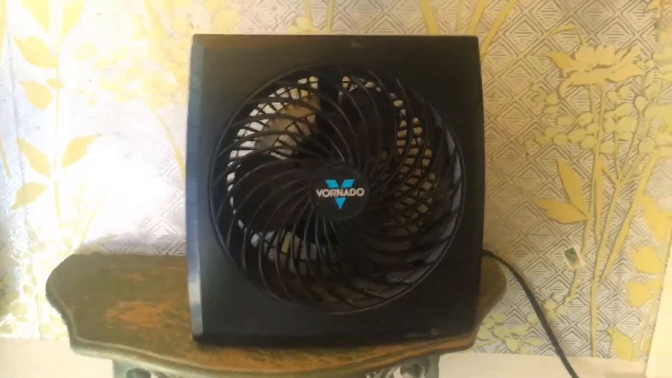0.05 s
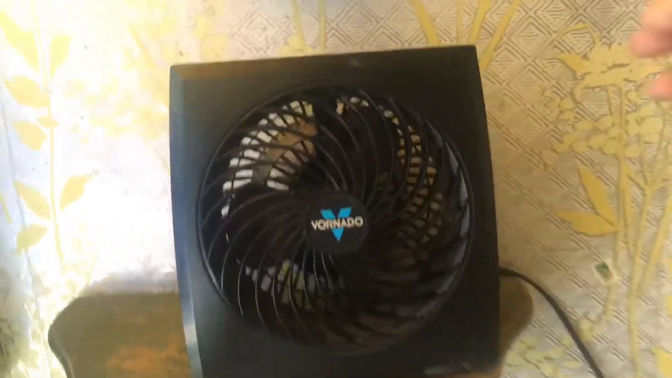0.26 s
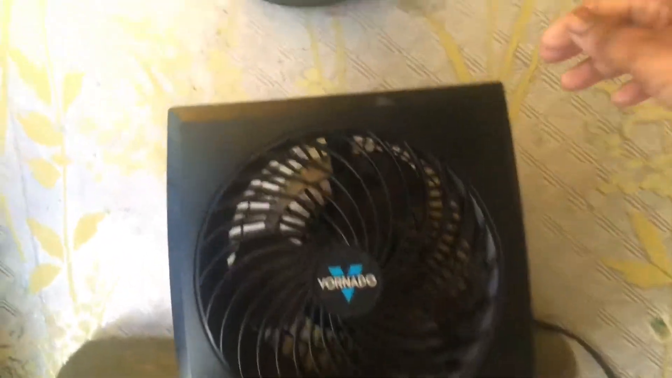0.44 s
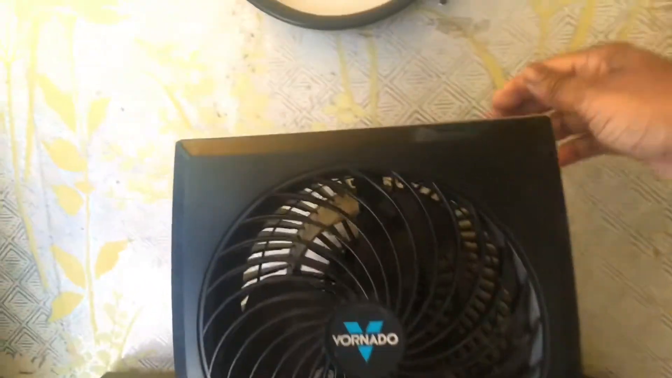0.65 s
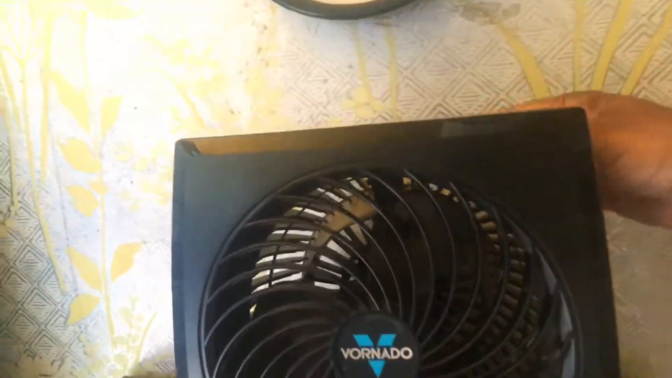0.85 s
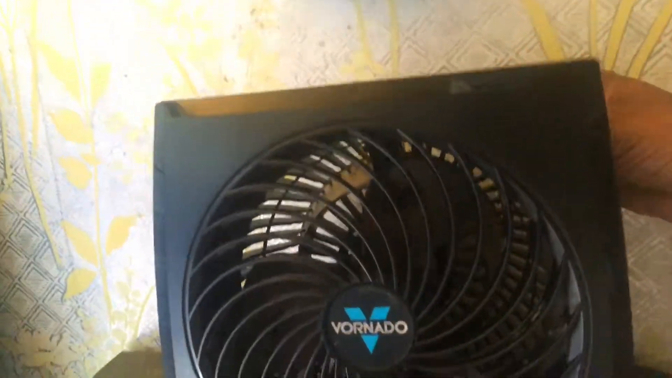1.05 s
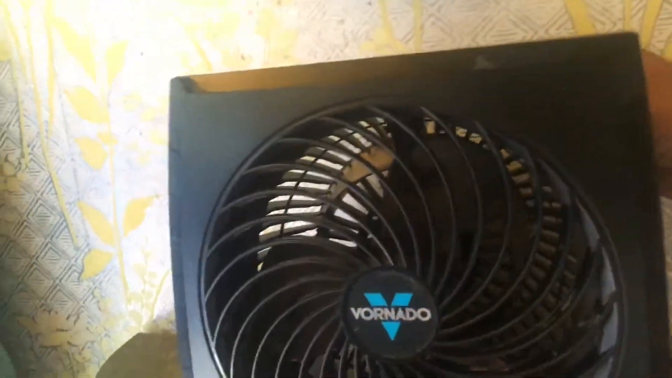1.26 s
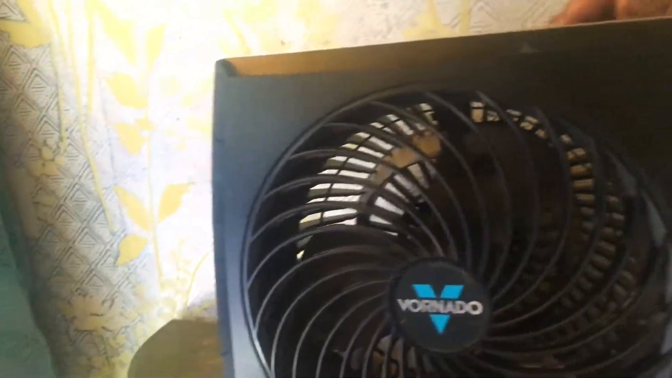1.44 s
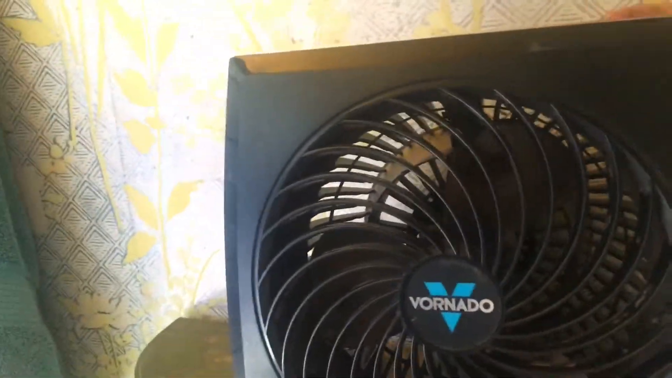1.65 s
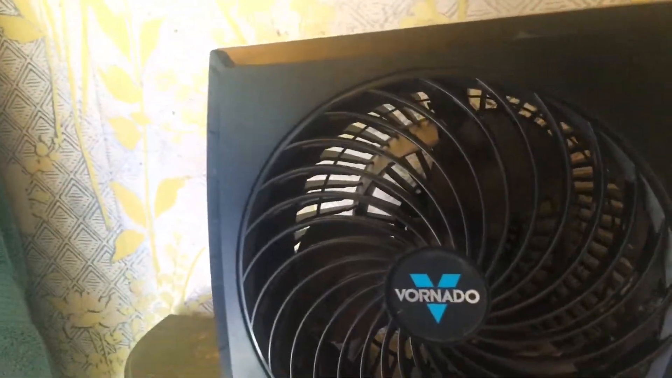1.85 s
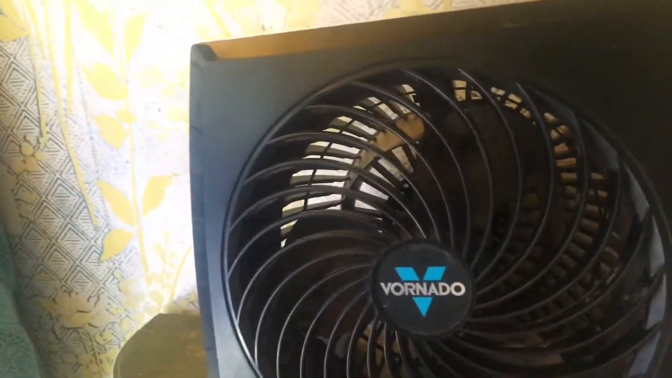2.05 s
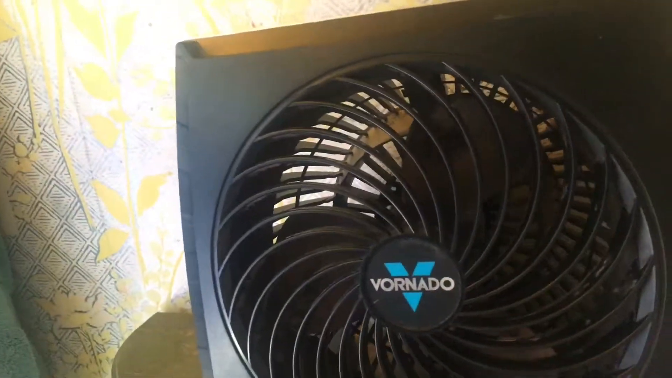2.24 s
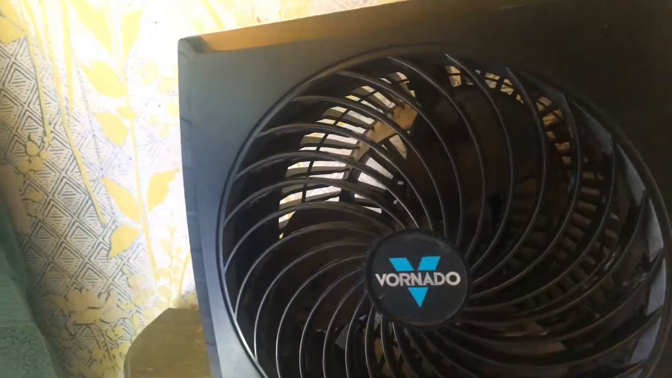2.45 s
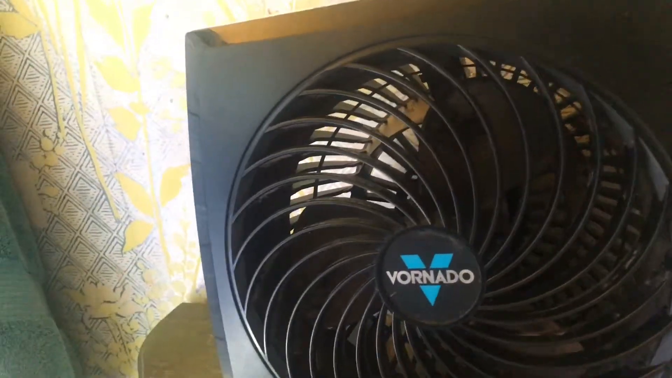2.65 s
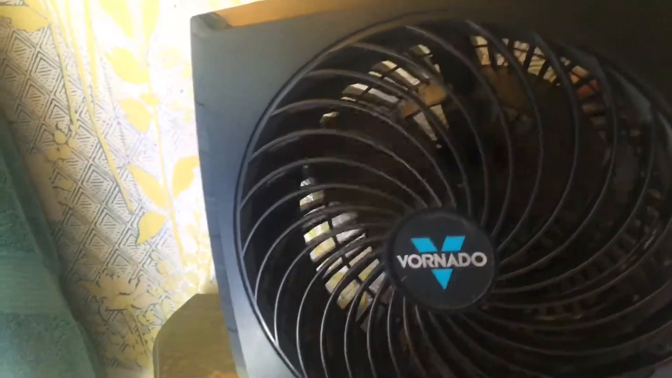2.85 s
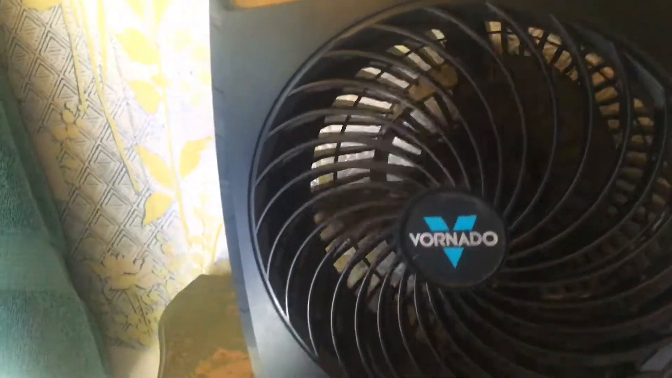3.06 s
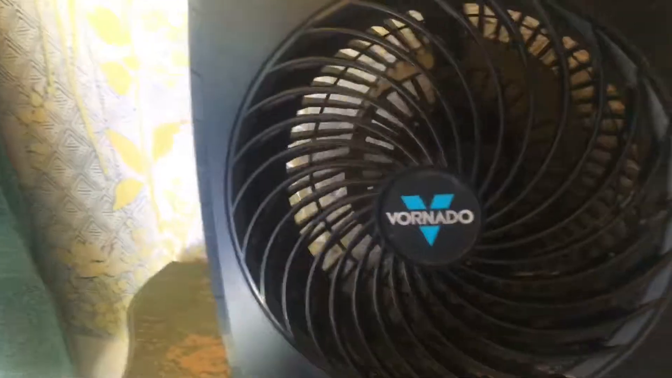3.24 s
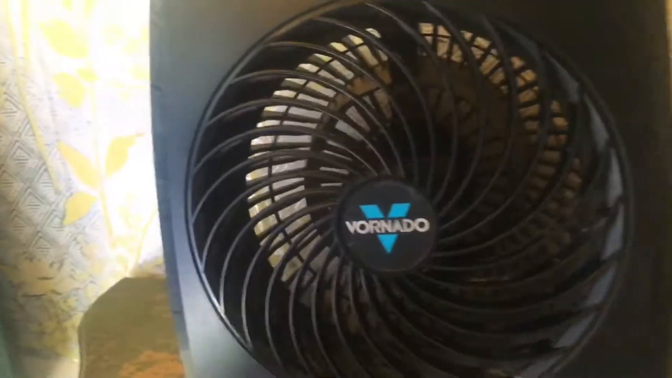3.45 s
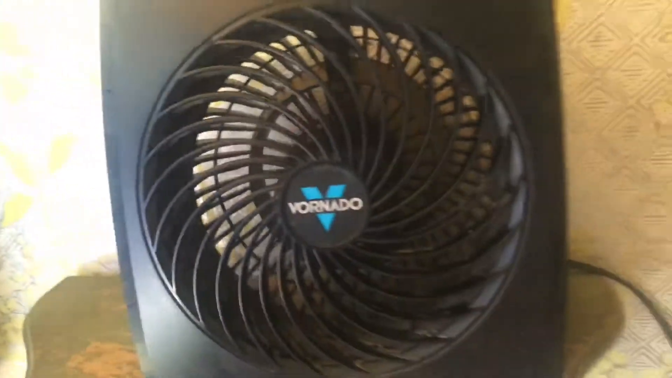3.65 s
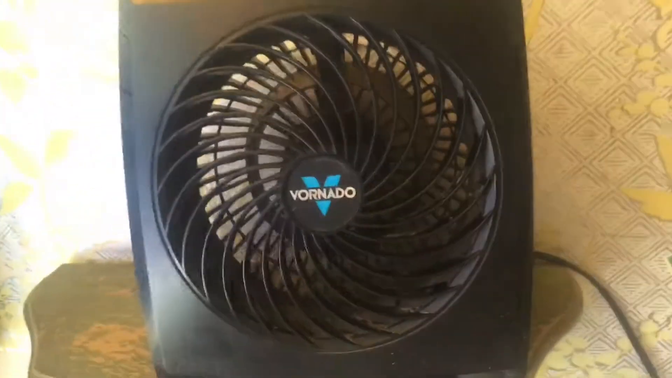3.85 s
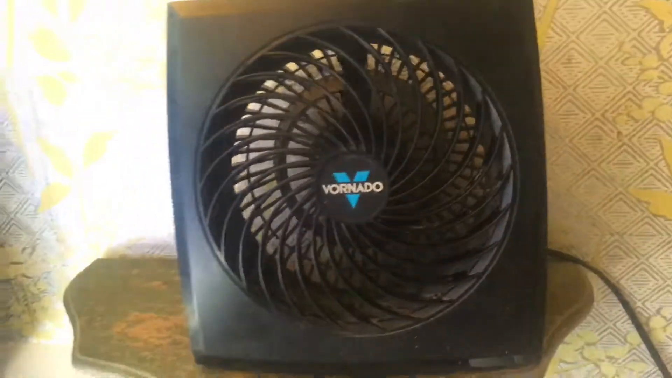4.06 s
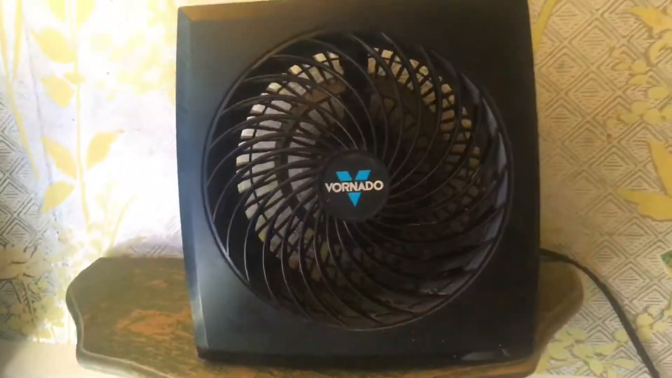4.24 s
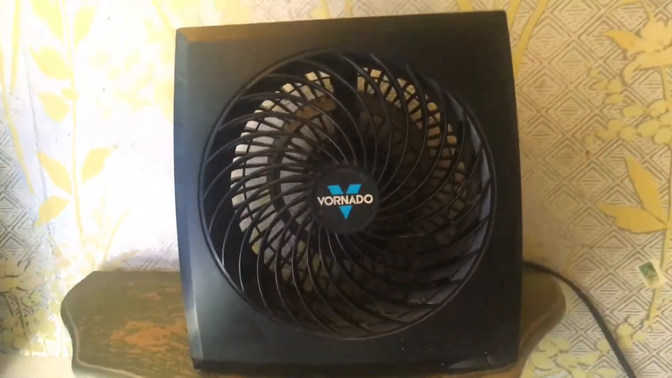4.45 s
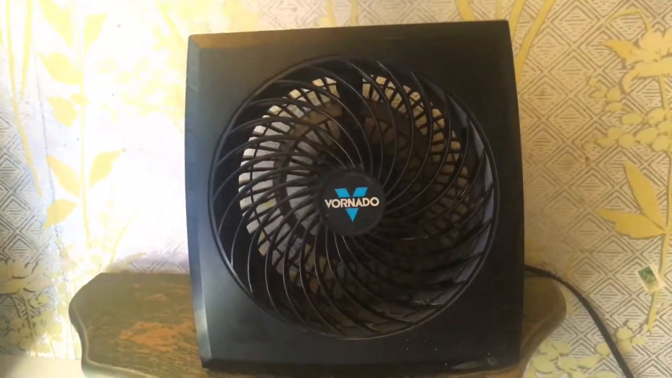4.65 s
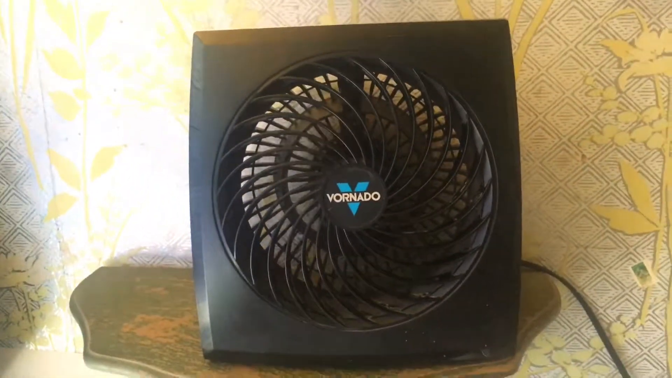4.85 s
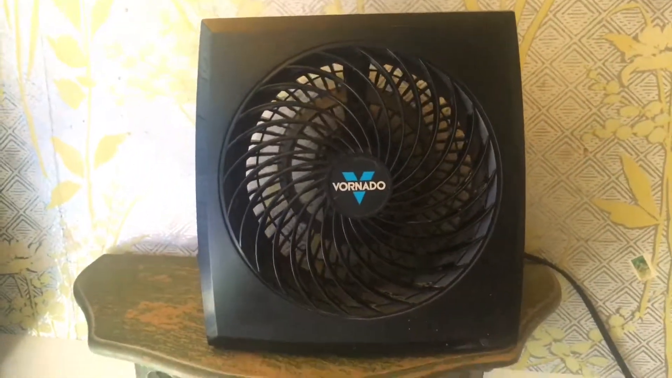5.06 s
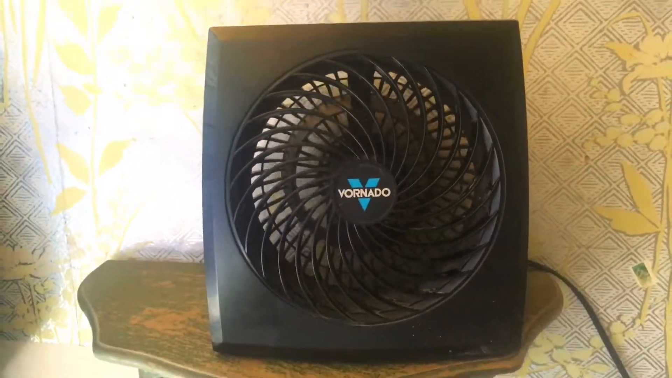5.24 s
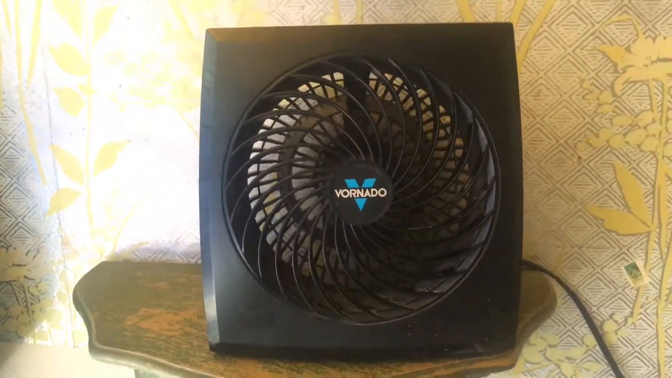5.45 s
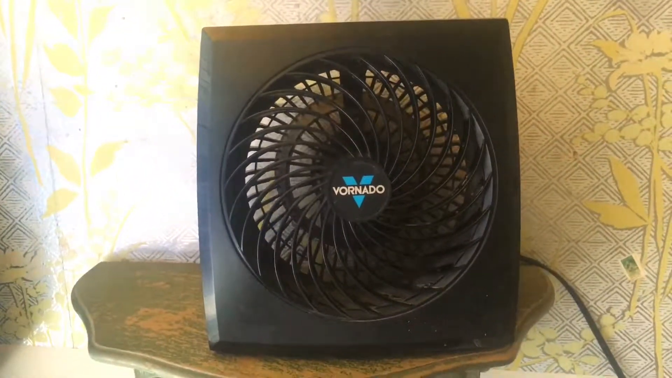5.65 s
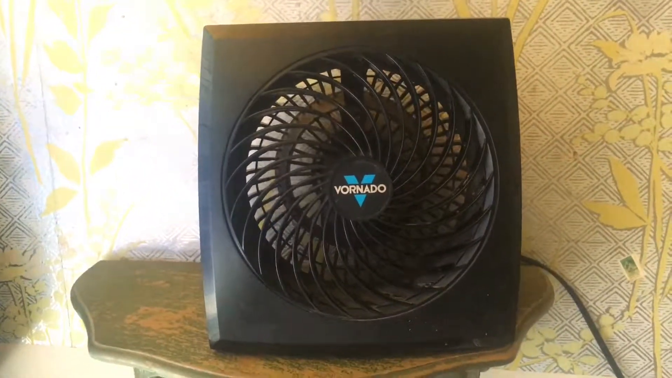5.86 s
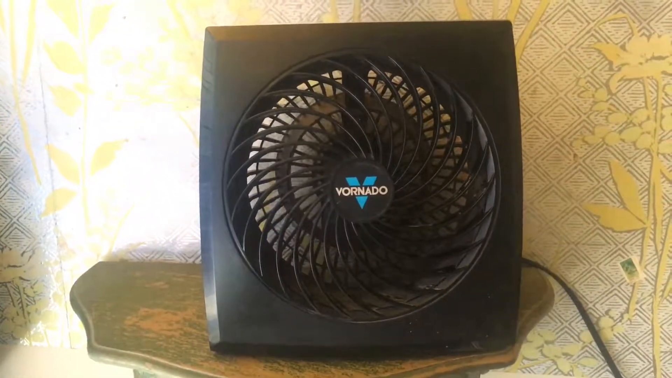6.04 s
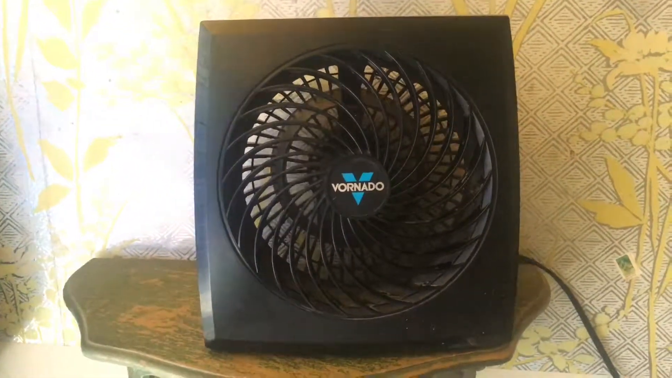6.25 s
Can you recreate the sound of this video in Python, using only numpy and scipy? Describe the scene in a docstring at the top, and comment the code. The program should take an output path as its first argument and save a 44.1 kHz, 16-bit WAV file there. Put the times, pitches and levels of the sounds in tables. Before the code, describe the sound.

For the first 0.8 seconds there is only quiet low room tone with very faint skin rubbing. From about 0.9 to 2.8 seconds a hand slides on the thin plastic case of a small fan close by: short dry scuffs, irregular light knocks, tiny ticks, faint squeaks and soft low thumps, with short room reflections. At 2.85 a hard, bright switch snap bounces quickly, with a low thump. A low mains hum begins and strains from 2.96, joined at 3.04 by a grainy bearing rasp; a small finger brush comes at 3.1. The rotor speeds up, its faint blade tone gliding upward as rasp becomes steady rushing air by about 4. From 3.5 the jet reaches the microphone, swelling into a loud, dense bass rumble with several gusts each second. Sharp buffeting thuds punctuate it around 4.2, 4.7, 5.7 and 6.1-6.3, and it is still running at the end.

```python
"""A hand slides and knocks along the plastic case of a small box fan, then snaps its switch on.
Case modes ring to sticking skin, knocks and the switch; the motor answers with a harmonic hum.
Worn bearings rasp as slips through duct resonances, then rushing air and a blade tone take over.
Last, the jet reaches the microphone: shaped noise in gusts makes a loud, dense rumble with sharp eddies."""
import sys
import numpy as np
from scipy import signal
from scipy.fft import rfft, irfft
from scipy.io import wavfile
from scipy.ndimage import uniform_filter1d

SR = 44100
rng = np.random.default_rng(int(sys.argv[2]) if len(sys.argv) > 2 else 0)


def output_pcm(signal):
    """Save a mono or channel-first signal as 16-bit PCM at the path in sys.argv[1].

    Samples are clipped to [-1, 1] before scaling.
    """
    pcm = np.clip(np.atleast_2d(signal).T, -1, 1) * 32767
    wavfile.write(sys.argv[1], SR, np.round(pcm).astype(np.int16))


N = 277830
TIME = np.arange(N) / SR   # s

# ringing modes of the plastic case: (pitch [Hz], relative level [dB], t60 [s])
CASE_MODES = [(262, -9.5, 0.093), (327, -13, 0.34), (402, -12.5, 0.083), (502.5, -21, 0.24),
              (713, -11, 0.025), (746, -17.5, 0.026), (1127, -7, 0.05), (1080, -1.5, 0.015),
              (1325, -6.5, 0.061), (1412, 3.5, 0.021), (1610, -6, 0.051), (1624, 5.5, 0.012),
              (1830, -5, 0.019), (1853, -8, 0.042), (2106, 1.5, 0.015), (2245, -2, 0.027),
              (2570, -6.5, 0.028), (2766, -4, 0.019), (3150, -6, 0.021), (3510, -1, 0.012),
              (4240, -16, 0.036), (5270, -22.5, 0.011), (5820, -12, 0.027)]

HUM_HZ = 120   # twice the mains rate
# the switch closes, then the rotor starts and runs up to full speed
POWER_ON_S, START_S, RUN_UP_S = 2.86, 2.96, 0.385


def from_db(db):
    """Decibels to gain."""
    return 10 ** (np.asarray(db) / 20)


def rms_one(x):
    """Scale to unit power."""
    return x / np.sqrt(np.mean(x ** 2) + 1e-20)


def in_time(rows):
    """Each column of a curve at every sample."""
    s, *columns = np.transpose(rows)
    return [np.interp(TIME, s, c) for c in columns]


def butter(x, hz, kind, order=2):
    """Causal Butterworth filter."""
    sos = signal.butter(order, np.clip(hz, 10, SR * 9 / 20), kind, fs=SR, output="sos")
    return signal.sosfilt(sos, x + 1e-18)


def colour(x, spectrum, resonances=()):
    """Give a steady excitation a spectrum with resonant humps and dips; rms 1."""
    hz = np.maximum(np.arange(N // 2 + 1) * SR / N, 1)
    points, db = np.transpose(spectrum)
    db = np.interp(np.log(hz), np.log(points), db)
    for centre, width, peak_db in resonances:
        db = db + peak_db / (1 + (2 * (hz - centre) / width) ** 2)
    low_cut = np.minimum(hz / points[0], 1) ** 2   # roll off below the first point
    return rms_one(irfft(rfft(x) * from_db(db) * low_cut, N))


def noise():
    """White noise."""
    return rng.standard_normal(N)


def drift(rate):
    """Smooth chance with spread 1, changing about rate times a second."""
    steps = N // 16
    hz = np.arange(steps // 2 + 1) * SR / N
    slow = irfft(rfft(rng.standard_normal(steps)) / (1 + (hz / rate) ** 2) ** 2, steps)
    return np.interp(TIME, np.linspace(0, TIME[-1], steps), rms_one(slow))


def grains(per_s, spread_db):
    """Random tiny slips of uneven size; rms 1."""
    happens = rng.random(N) < per_s / SR
    return rms_one(happens * noise() * from_db(spread_db * rng.random(N)))


def click(s):
    """A unit impulse."""
    return signal.unit_impulse(N, int(round(s * SR)))


def ring(x, hz, t60):
    """A resonance: a unit click sets a sine of height 1 ringing."""
    decay = from_db(-60 / (t60 * SR))
    w = 2 * np.pi * hz / SR
    return signal.lfilter([0, np.sin(w)], [1, -2 * decay * np.cos(w), decay * decay], x + 1e-18)


def dying(kicks, t60):
    """Envelope that jumps at each kick and dies away."""
    return signal.lfilter([1], [1, -from_db(-60 / (t60 * SR))], kicks + 1e-18)


def blip(s, hz, rise_s):
    """A short tone whose envelope swells to height 1 and dies."""
    age = np.maximum(TIME - s, 0) / rise_s
    return age * np.exp(1 - age) * np.sin(2 * np.pi * hz * (TIME - s))


def swell(s, rise_s, fall_s):
    """Envelope that grows to 1 at time s and dies away."""
    return np.exp(-np.maximum(s - TIME, 0) / rise_s - np.maximum(TIME - s, 0) / fall_s)


def rise(s, lag_s):
    """Envelope that sets in at time s and settles at 1."""
    return 1 - np.exp(-np.maximum(TIME - s, 0) / lag_s)


def room(x, wet_db, t60=0.19):
    """Near walls answer quickly with dense, dying reflections."""
    t = TIME[:SR // 2]
    tail = rng.standard_normal(len(t)) * np.exp(-np.log(1000) * t / t60) * (t > 0.005)
    return x + from_db(wet_db) * signal.fftconvolve(x, tail / np.linalg.norm(tail))[:N]


def room_tone(level_db=-54):
    """The quiet room is steady noise, heaviest in the lows."""
    # room spectrum: (frequency [Hz], density [dB per Hz])
    room_spectrum = [(20, 2), (60, -16.5), (125, 0), (200, -18), (320, -20), (500, -29.5), (1500, -30),
                     (3500, -37.5), (7300, -40), (15500, -41)]
    return from_db(level_db) * colour(noise(), room_spectrum)


def handling(tick_rise_s=0.00044, thump_t60=0.23):
    """Dry ticks close by, and soft low rocking and shaking of the case."""
    # small dry ticks: (time [s], peak [dB], pitch [Hz])
    tick_rows = [(0.862, -35.5, 4040), (0.862, -39, 1890), (1.012, -32, 12600), (1.083, -45, 13000),
                 (1.424, -50, 10400), (1.5565, -36, 2180), (1.825, -51, 11400), (1.929, -29.5, 2380),
                 (2.064, -46.5, 2840), (2.248, -30, 2820), (2.248, -36, 5740), (2.462, -41.5, 9450),
                 (2.508, -37.5, 3400), (3.218, -46, 12700)]
    # hollow thumps as the case rocks and flexes on its table: (time [s], peak [dB], pitch [Hz])
    thump_rows = [(0.923, -45, 78.5), (0.959, -35, 73), (1.557, -38, 120), (1.561, -45, 395),
                  (1.623, -44.5, 364), (2.501, -35, 68), (2.857, -29, 116), (2.92, -27, 69),
                  (3.223, -35, 282)]
    # low rumble of handling and shaking, before a 3 dB lift: (time [s], level [dB])
    shake_level = [(0.0, -53.5), (1.0, -51), (1.5, -51), (2.2, -51.5), (2.35, -44.5), (2.8, -51),
                   (3.5, -43)]
    # spectrum of the shaking: (frequency [Hz], density [dB per Hz])
    shake_spectrum = [(20, -3), (40, -14.5), (70, -13), (110, -23), (200, -50.5), (600, -71.5)]
    ticks = sum(from_db(db) * blip(s, hz, tick_rise_s) for s, db, hz in tick_rows)
    thumps = sum(from_db(db) * ring(click(s), hz, thump_t60) for s, db, hz in thump_rows)
    shake = from_db(3.0 + in_time(shake_level)[0]) * colour(noise(), shake_spectrum)
    return room(ticks, wet_db=-18.0) + thumps + shake


def squeaks(rough=0.122):
    """Slips of a dragging fingertip fall into a ragged rhythm that slows with the finger."""
    # squeaks: (start [s], length [s], start pitch [Hz], end pitch [Hz], level [dB])
    squeak_rows = [(1.05, 0.036, 3120, 2380, -60), (1.068, 0.037, 1900, 1020, -47.5),
                   (1.966, 0.068, 1610, 970, -54.5)]
    out = np.zeros(N)
    for s, length, start_hz, end_hz, db in squeak_rows:
        along = np.clip((TIME - s) / length, 0, 1)
        pitch = (start_hz + (end_hz - start_hz) * along) * (1 + rough * drift(390))
        out += from_db(db) * np.sin(np.pi * along) * np.sin(2 * np.pi * np.cumsum(pitch) / SR)
    return out


def rubbing(release_s=0.037, low_cut_hz=360):
    """Skin sticks and slips on the plastic, heard directly and through the ringing case."""
    # strokes press harder until they let go: (firmest pressure [s], level [dB], swell [s])
    stroke_rows = [(0.025, -56, 0.0056), (0.365, -51, .055), (0.6, -61.5, 0.1), (0.911, -40.5, 0.0075),
                   (0.988, -36.5, 0.033), (1.18, -46, 0.04), (1.245, -47.5, 0.0065), (1.309, -38, 0.006),
                   (1.645, -42, 0.022), (1.97, -54.5, 0.097), (2.2, -51.5, 0.096), (2.28, -57, 0.012),
                   (2.355, -52.5, 0.028), (2.46, -51, 0.04), (2.515, -52.5, .01), (2.663, -47, 0.0058),
                   (2.837, -41, 0.096), (2.999, -44, 0.033)]
    # spectrum of the skin itself: (frequency [Hz], density [dB per Hz])
    skin_spectrum = [(150, 6), (350, -2), (750, 6.5), (1400, 7), (2500, -14.5), (4500, -19.5),
                     (6500, -13.5), (8000, -28), (15000, -29)]
    slips = grains(per_s=2000, spread_db=11.0)
    case_ring = np.zeros(N)
    for k, (hz, db, t60) in enumerate(CASE_MODES):
        reach = from_db(db + 5.0 * drift(16))   # the moving finger reaches each mode more or less well
        case_ring += reach * ring(slips * (-1) ** k, hz, t60)
    # light skin hardly moves the lowest modes
    case_ring = rms_one(butter(case_ring, low_cut_hz, "high", order=1))
    pressure = sum(from_db(db) * swell(s, swell_s, release_s) for s, db, swell_s in stroke_rows)
    return pressure * (from_db(-3.5) * case_ring + from_db(-3.5) * colour(slips, skin_spectrum))


def blows(rows, body_db, crack_db, crack_t60, focus_db, scuff, tail_db, wet_db):
    """Each contact skids briefly, favours the case modes around its own pitch and adds a bright crack."""
    s, peak_db, treble_db, favoured_hz, skid_t60 = np.transpose(rows)
    hits = np.array([click(start) for start in s])
    skid_times = np.maximum(skid_t60, 0.003)
    skids = np.array([dying(hit, t60) / np.sqrt(t60 * SR) for hit, t60 in zip(hits, skid_times)])
    body = np.zeros(N)
    for hz, db, t60 in CASE_MODES:
        octaves_away = np.abs(np.log2(hz / favoured_hz))
        strength = from_db(peak_db + db - focus_db * octaves_away)
        strike = (strength * rng.choice([-1, 1], len(s))) @ hits
        skid = scuff * (strength @ skids) * noise()
        body += ring(strike + skid, hz, t60)
    hard = from_db(peak_db + treble_db) @ hits
    # the snap and its room tail
    crack = noise() * (dying(hard, crack_t60) + from_db(tail_db) * dying(hard, 0.18))
    crack = butter(butter(crack, 2600, "high"), 9500, "low", order=1)
    return from_db(body_db) * room(body, wet_db) + from_db(crack_db) * crack


def finger_knocks(skid_t60=0.03):
    """Fingers knock and scuff on the case, setting its modes ringing."""
    # knocks: (time [s], relative peak [dB], treble against peak [dB], most favoured pitch [Hz])
    knock_rows = [(0.906, -19.5, -18, 1360), (0.961, -27.5, -15, 1380), (1.104, -28, -28, 1080),
                  (1.241, -26.5, -33, 1540), (1.303, -20.5, -17, 1400), (1.357, -29, -14, 1710),
                  (1.557, -22, -22, 1690), (1.618, -29, -28, 1480), (1.704, -29, -15, 2160),
                  (2.267, -23.5, -33, 1450), (2.354, -38, -8, 1630), (2.452, -30.5, -9, 1930),
                  (2.504, -28.5, -15, 1280), (2.652, -30.5, -9, 1160), (2.763, -29.5, -14, 1740),
                  (2.811, -38, 6, 1480)]
    return blows([(*row, skid_t60) for row in knock_rows], body_db=-14.5, crack_db=-13, crack_t60=0.072,
                 focus_db=6, scuff=4.1, tail_db=-7, wet_db=-6.0)


def switch_snap(low_cut_hz=600):
    """The switch snaps over, seats and bounces; its small rocker hardly moves the lowest modes."""
    # contacts: (time [s], relative peak [dB], treble against peak [dB], most favoured pitch [Hz],
    # skid t60 [s])
    contact_rows = [(2.8497, -13.5, -3.5, 2530, 0.027), (2.8525, -12.5, -12, 1550, 0.0097),
                    (2.8555, -23, -19, 1120, 0.0095), (2.8597, -41, -15, 1200, .012)]
    snap = blows(contact_rows, body_db=-6.5, crack_db=-4.0, crack_t60=0.013,
                 focus_db=3.5, scuff=1.9, tail_db=-10, wet_db=-4.0)
    return butter(snap, low_cut_hz, "high")


def brush_off(brush_s=3.108, level_db=-45, swell_s=0.008, release_s=0.02):
    """A fingertip brushes off the switch in a breath of bright noise."""
    bright = rms_one(butter(noise(), 3000, "high"))
    return from_db(level_db) * swell(brush_s, swell_s, release_s) * bright


def hand():
    """Skin rubs and squeaks on the plastic, fingers knock, the switch snaps."""
    return rubbing() + finger_knocks() + switch_snap() + brush_off() + squeaks()


def speed():
    """Rotor speed as a share of full speed."""
    return rise(START_S, RUN_UP_S)


def airflow():
    """How far the air has taken over from the straining motor, 0-1: a steep power of speed."""
    return speed() ** 7.1


def motor(first_db=-54, strain_db=-36.5, running_db=-47.5, attack_s=0.065, waver_db=1.7):
    """The iron hums in harmonics, hardest while the rotor is still slow."""
    # hum harmonics: (multiple of the hum pitch, relative level [dB])
    hum_orders = [(1, -2.5), (2, -3), (3, -4.5), (5, -13), (6, -19.5)]
    phase = 2 * np.pi * HUM_HZ * TIME
    orders = np.zeros(N)
    for k, db in hum_orders:
        level = from_db(db + waver_db * drift(7))
        orders += level * np.sin(k * phase + rng.uniform(0, 2 * np.pi))
    # the hum starts at first_db, strains as the rotor starts and eases as the air takes over
    pulling = rise(START_S, attack_s)
    pulling_db = strain_db + (running_db - strain_db) * airflow()
    hum_db = first_db + (pulling_db - first_db) * pulling
    return np.sqrt(2) * rise(POWER_ON_S, 0.005) * from_db(hum_db) * orders


def blade_tone(full_speed_hz=595, base_db=-65, waver_db=3):
    """Blades cut past the grille; the tone swells as it glides through a resonance of the housing."""
    housing_hz, housing_width_hz, housing_db = 540, 42, 18
    pitch = full_speed_hz * speed()
    tone_db = base_db + housing_db * np.exp(-((pitch - housing_hz) / housing_width_hz) ** 2)
    phase = 2 * np.pi * np.cumsum(pitch * (1 + 0.0023 * drift(25))) / SR
    level = speed() ** 2 * from_db(tone_db + waver_db * drift(35))
    return np.sqrt(2) * level * np.sin(phase)


def rotor(running_s=3.04, attack_s=0.018, rasp_db=-40.5, air_db=-41, tick_db=-68, throb=0.09, unsteady_db=0.82):
    """Bearing rasp, shaken by the hum, gives way to rushing air and a blade tone as speed builds."""
    # spectra of the bearing rasp and the rushing air: (frequency [Hz], density [dB per Hz])
    rasp_spectrum = [(150, 3), (400, -3.5), (700, -0.5), (870, -3), (1200, 0), (1450, -0.5), (2200, -2),
                     (2600, -5), (3100, -11.5), (4700, -27.5), (6800, -28), (7600, -68), (15000, -42)]
    air_spectrum = [(300, 3.5), (650, -0.5), (900, 1), (1200, 0.5), (1500, -2.5), (2100, 0), (2600, -5.5),
                    (4000, -14.5), (4800, -19.5), (6800, -21.5), (7600, -25.5), (10400, -25), (15500, -35)]
    # resonances of the duct and grille: (centre [Hz], width [Hz], peak [dB])
    duct_modes = [(1050, 100, -3), (1200, 210, -5.5), (1415, 170, 6.5), (1808, 60, 12.5), (1827, 47, -15.5),
                  (2210, 310, 1), (2510, 400, -3), (2930, 160, 3.5), (5740, 770, 4.5)]
    # further resonances sounded by the air alone: (centre [Hz], width [Hz], peak [dB])
    air_modes = [(677, 69, 9), (4020, 290, 3.5), (6950, 290, 2), (10430, 850, -20.5)]
    share = airflow()
    shaken = 1 + throb * np.sin(2 * np.pi * HUM_HZ * TIME)
    rasp = colour(grains(per_s=5000, spread_db=11) * shaken, rasp_spectrum, duct_modes)
    air = colour(noise(), air_spectrum, duct_modes + air_modes) * from_db(unsteady_db * drift(36))
    # equal-power crossfade from rasp to air
    rush = np.sqrt(1 - share) * from_db(rasp_db) * rasp + np.sqrt(share) * from_db(air_db) * air
    # the dry bearing ticks while the rotor is slow
    ticks = rms_one(butter(grains(per_s=54, spread_db=6), 3000, "high"))
    ticking = from_db(tick_db) * (1 - share) * ticks
    return rise(running_s, attack_s) * (rush + ticking) + blade_tone()


def jet(reach_s=3.47, build_s=0.36, level_db=-14, gust_s=0.038, lull_depth=2.2, surge_db=0.2):
    """Strength of the jet at the microphone: it builds, then comes in gusts and lulls."""
    # the strongest gusts, each with a lull before and after: (time [s], swell [dB])
    gust_rows = [(3.57, 4), (3.7, 3.5), (3.861, 4.5), (4.11, 4.5), (4.228, 5), (4.33, 2.5), (4.461, 3.5),
                 (4.8, 2.5), (4.91, 6), (5.148, 2), (5.247, 3.5), (5.351, 3), (5.499, 6), (5.67, 6.5),
                 (5.809, 6), (5.95, 1), (6.079, 4)]
    db = level_db + surge_db * drift(23)   # lesser surges come by chance
    for s, swell_db in gust_rows:
        u = (TIME - s) / gust_s
        db = db + swell_db * (1 - lull_depth * u ** 2) * np.exp(-u ** 2)
    return rise(reach_s, build_s) * from_db(db)


def sharp_eddies(core_s=0.0014, wake_db=-9, wake_s=0.0069):
    """Vortex cores strike the microphone port as sharp pulses, trailed by finer swirls."""
    # eddies: (time [s], core peak [dB])
    eddy_rows = [(4.118, -41), (4.221, -15), (4.447, -22.5), (4.646, -31), (4.667, -18), (4.772, -15),
                 (5.647, -18), (5.721, -15), (5.772, -20), (6.068, -13), (6.169, -9.5), (6.276, -16)]
    # spectrum of the trailing swirls: (frequency [Hz], density [dB per Hz])
    wake_spectrum = [(150, 7.5), (250, -2), (450, -15.5), (750, -16.5), (1200, -39), (5000, -120)]
    swirl = colour(noise(), wake_spectrum)
    out = np.zeros(N)
    for s, db in eddy_rows:
        u = (TIME - s) / core_s
        core = (1 - 2 * u ** 2) * np.exp(-u ** 2) * rng.choice([-1, 1])
        wake = swirl * np.exp(-((TIME - s) / wake_s - 0.5) ** 2)
        out += from_db(db) * (core + from_db(wake_db) * wake)
    return out


def wind(rumble_db=0.5, flutter_db=-22, lumpy_db=7.0, steadiness=0.48):
    """Turbulence on the microphone port: a rolling rumble, bursts of small eddies, a few sharp ones."""
    # spectra of the rumble and of the small eddies: (frequency [Hz], density [dB per Hz])
    rumble_spectrum = [(22, -12), (35, 1.5), (50, -1.5), (68, 3.5), (105, -3.5), (160, -12), (250, -25),
                       (420, -39), (700, -68), (4000, -130)]
    flutter_spectrum = [(100, 1), (190, -1.5), (300, -5), (500, -17.5), (900, -33.5), (5000, -120)]
    rumble = colour(noise(), rumble_spectrum)
    # even out the rumble: the jet holds its strength
    power = uniform_filter1d(rumble ** 2, size=SR // 14)
    rumble = rms_one(rumble / power ** (steadiness / 2))
    flutter = rms_one(colour(noise(), flutter_spectrum) * from_db(lumpy_db * drift(23)))
    buffeting = jet() * (from_db(rumble_db) * rumble + from_db(flutter_db) * flutter)
    return buffeting + sharp_eddies()


def scene():
    """The hand, the fan and its jet over a quiet room."""
    return (room_tone() + handling() + hand() + motor() + rotor() + wind())[None]


def record(dry):
    """The highest peaks are rounded and the top is cut."""
    rounded = dry / (1 + (dry / 0.9) ** 6) ** (1 / 6)
    top_cut = signal.ellip(12, 0.1, 80, 15750, fs=SR, output="sos")   # steep low-pass at 15750 Hz
    return signal.sosfilt(top_cut, rounded)


dry = scene()
out = record(dry)
output_pcm(out)
```